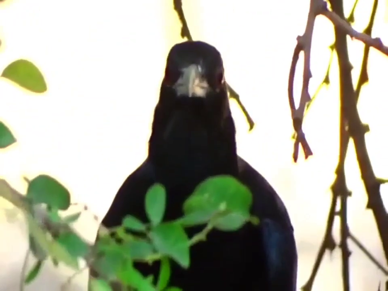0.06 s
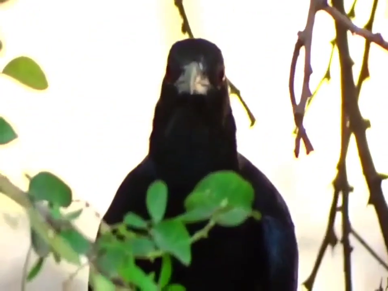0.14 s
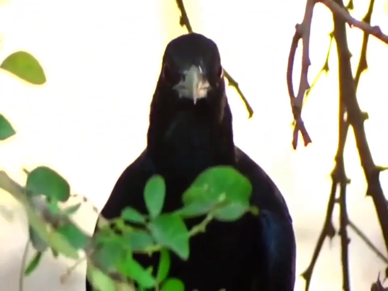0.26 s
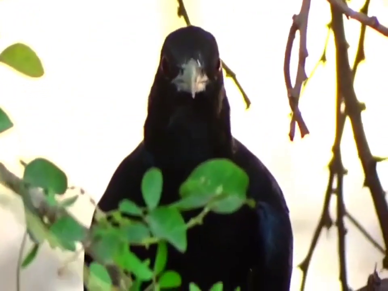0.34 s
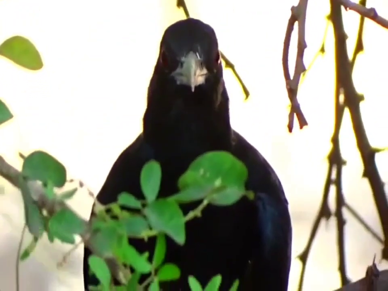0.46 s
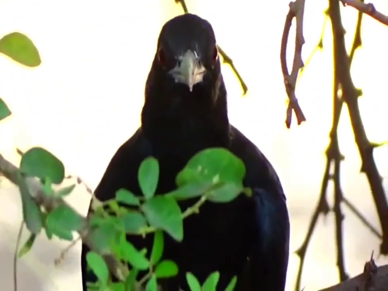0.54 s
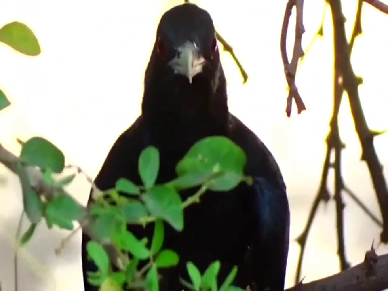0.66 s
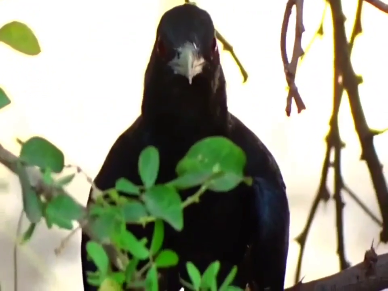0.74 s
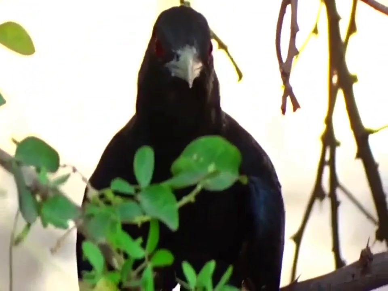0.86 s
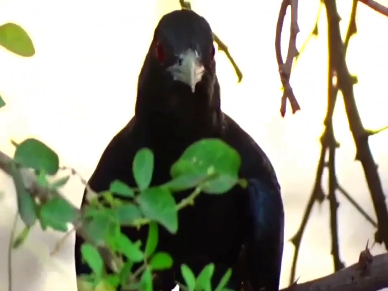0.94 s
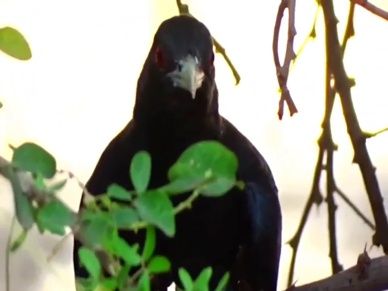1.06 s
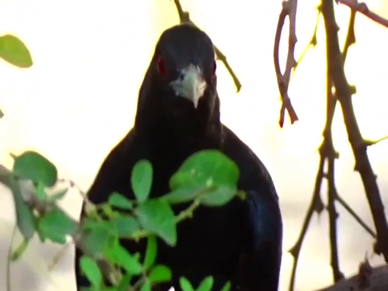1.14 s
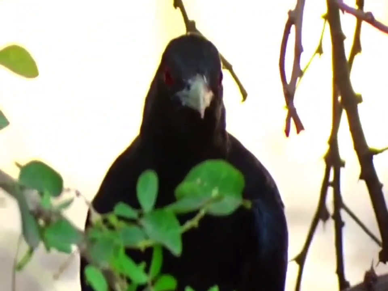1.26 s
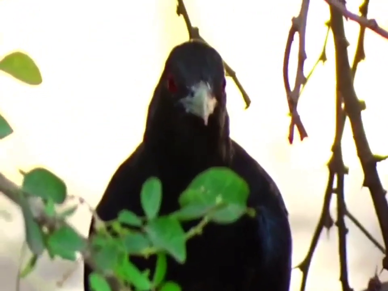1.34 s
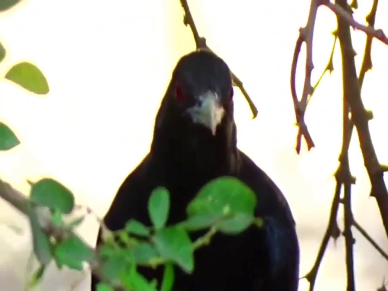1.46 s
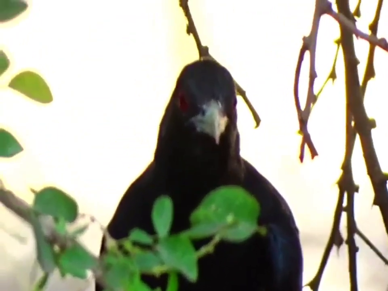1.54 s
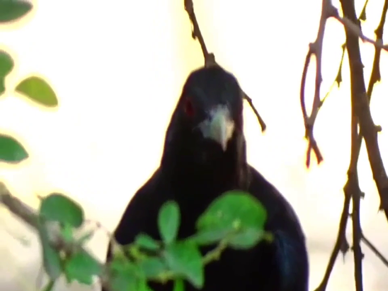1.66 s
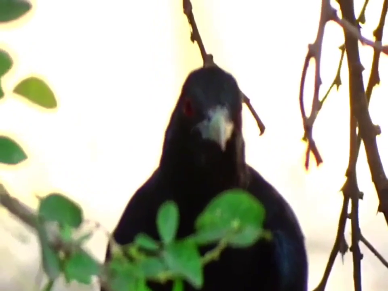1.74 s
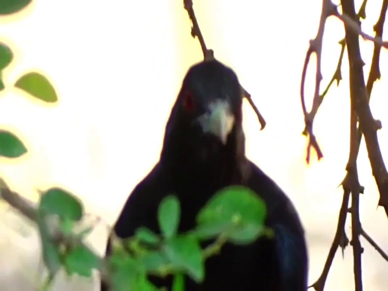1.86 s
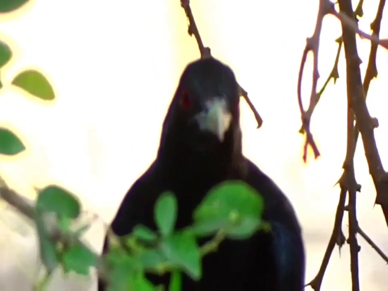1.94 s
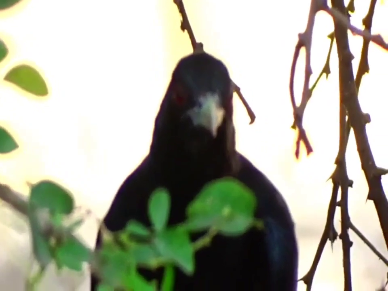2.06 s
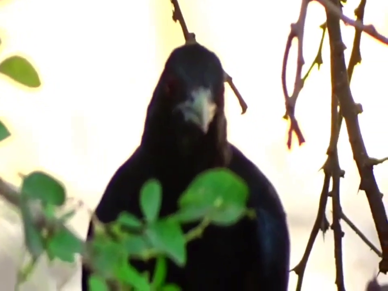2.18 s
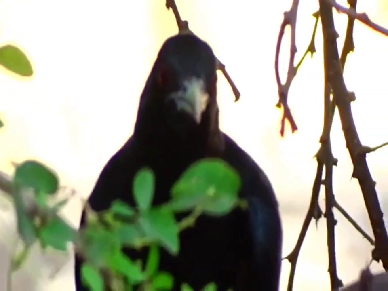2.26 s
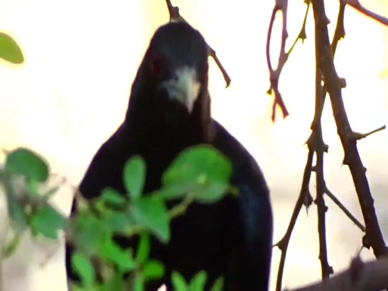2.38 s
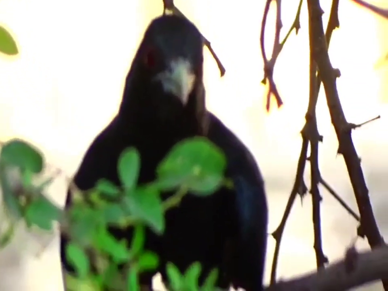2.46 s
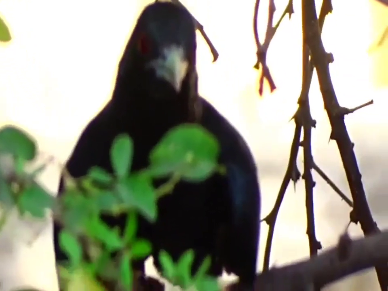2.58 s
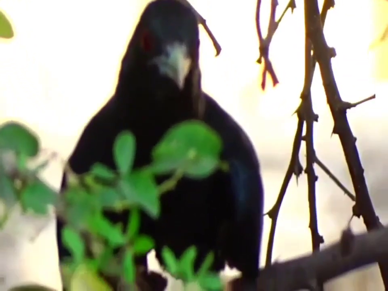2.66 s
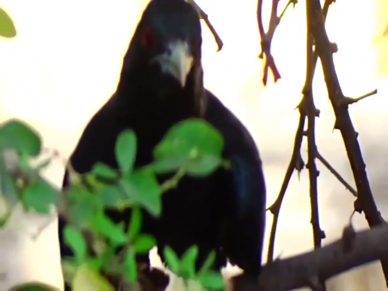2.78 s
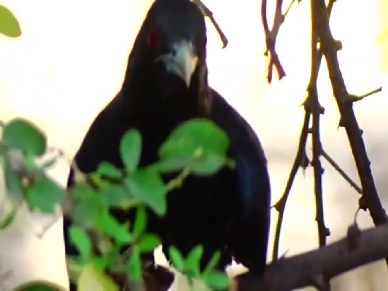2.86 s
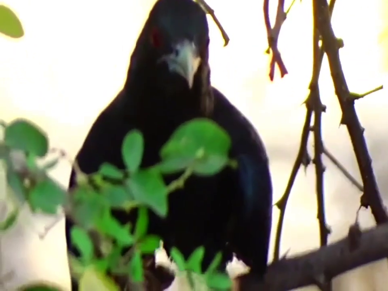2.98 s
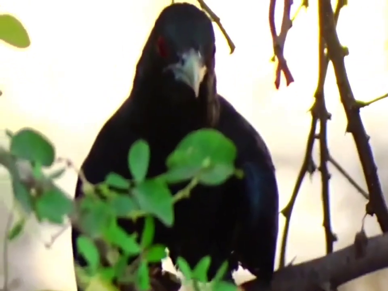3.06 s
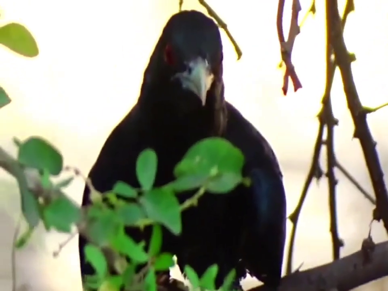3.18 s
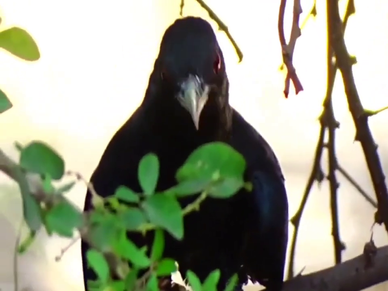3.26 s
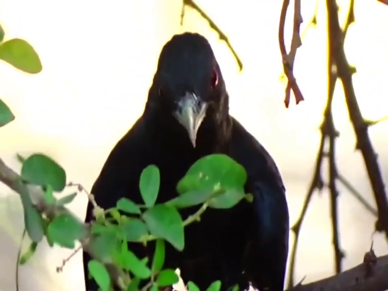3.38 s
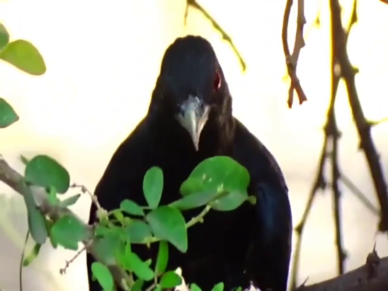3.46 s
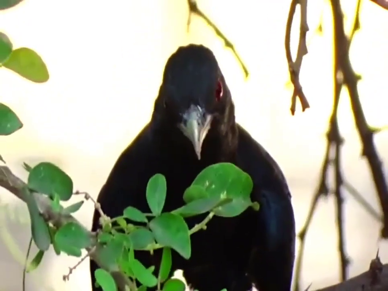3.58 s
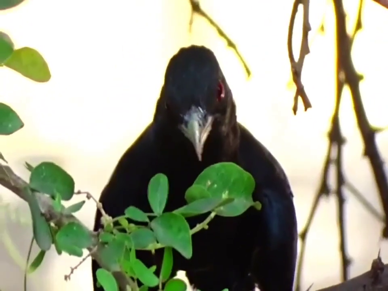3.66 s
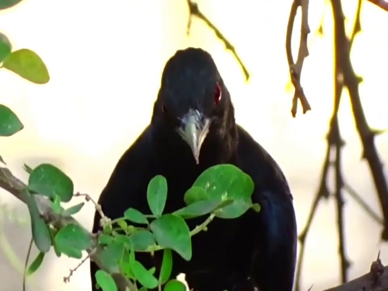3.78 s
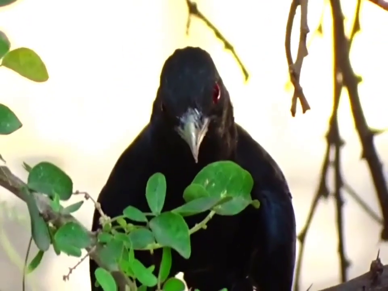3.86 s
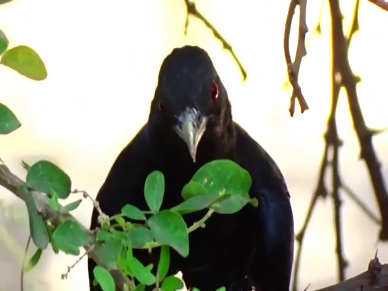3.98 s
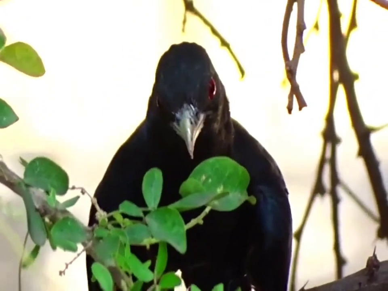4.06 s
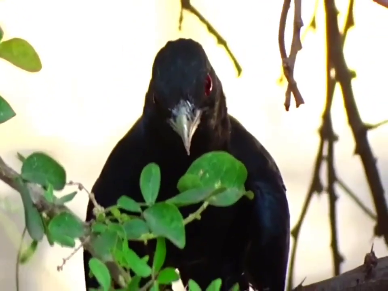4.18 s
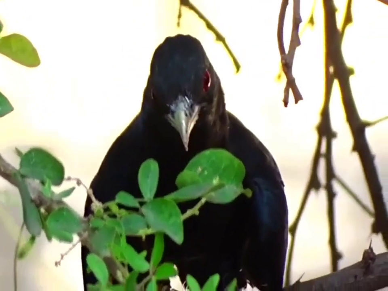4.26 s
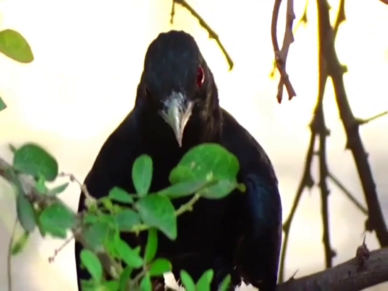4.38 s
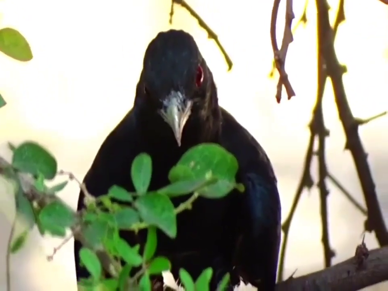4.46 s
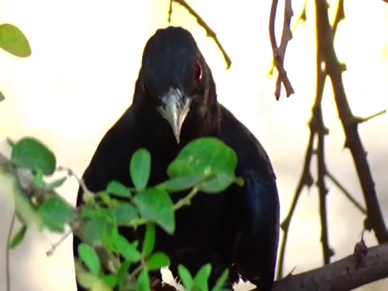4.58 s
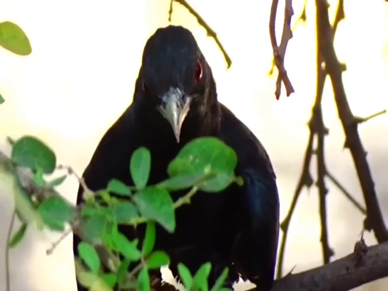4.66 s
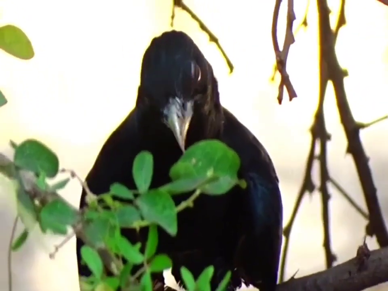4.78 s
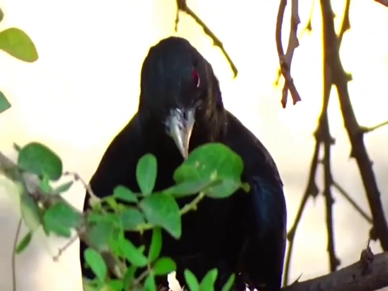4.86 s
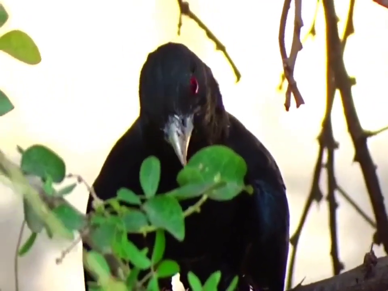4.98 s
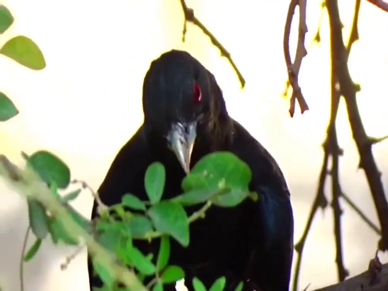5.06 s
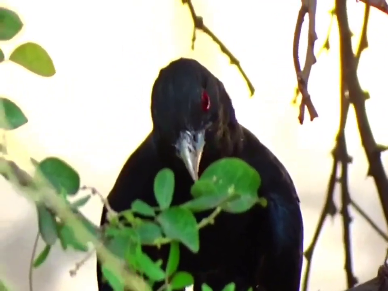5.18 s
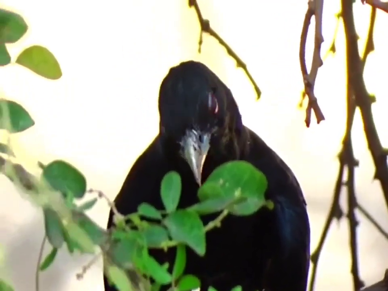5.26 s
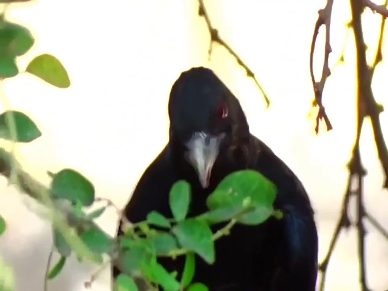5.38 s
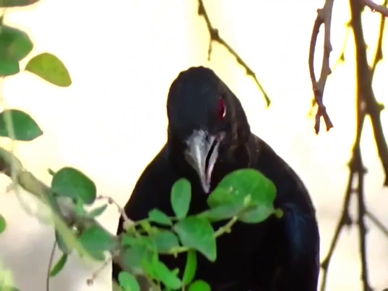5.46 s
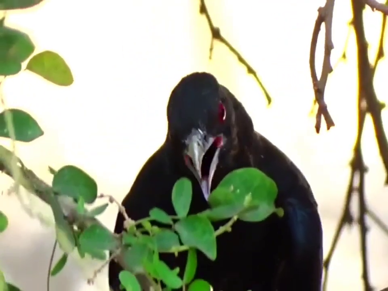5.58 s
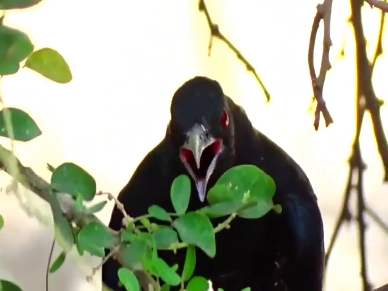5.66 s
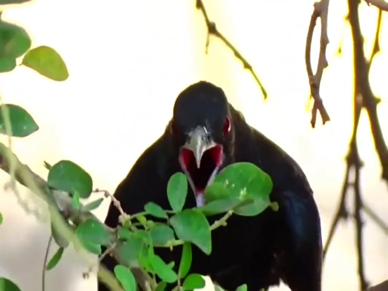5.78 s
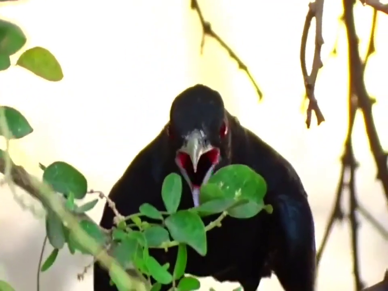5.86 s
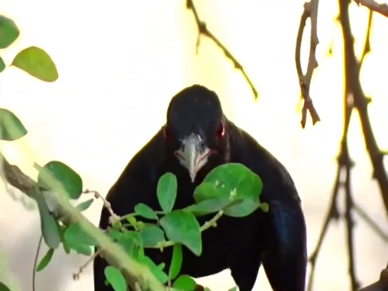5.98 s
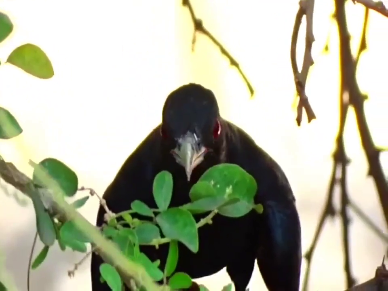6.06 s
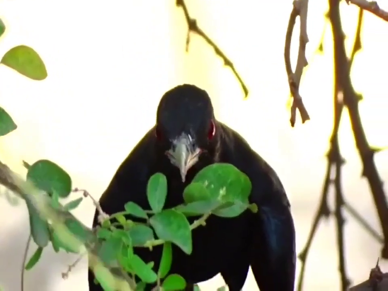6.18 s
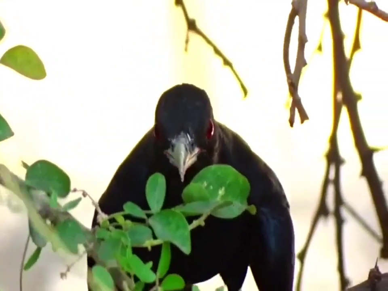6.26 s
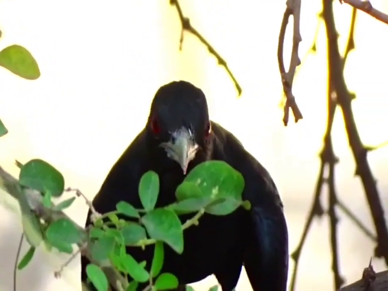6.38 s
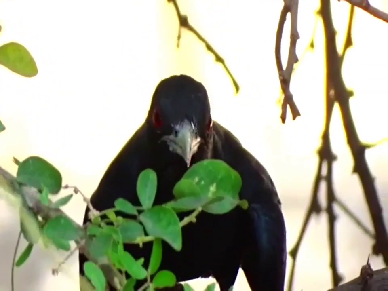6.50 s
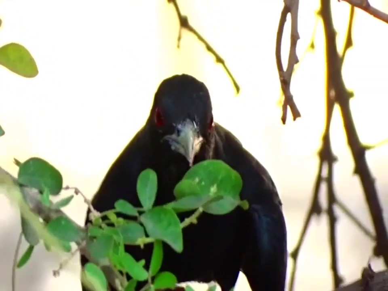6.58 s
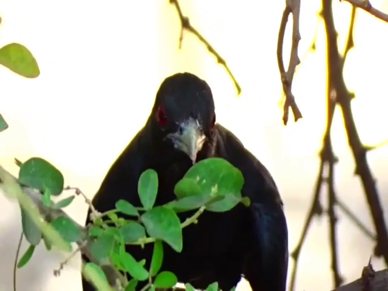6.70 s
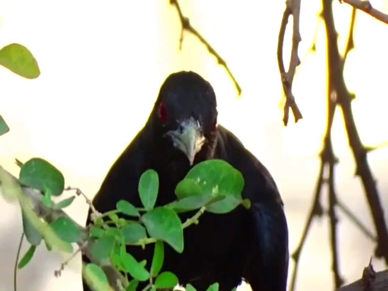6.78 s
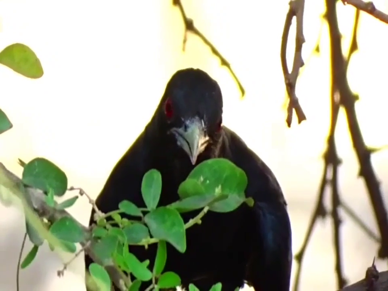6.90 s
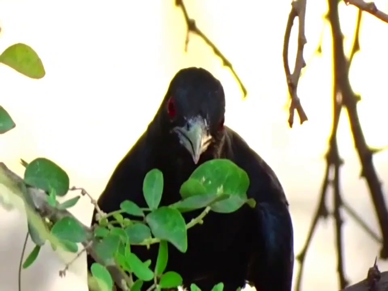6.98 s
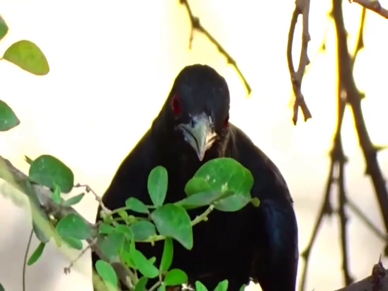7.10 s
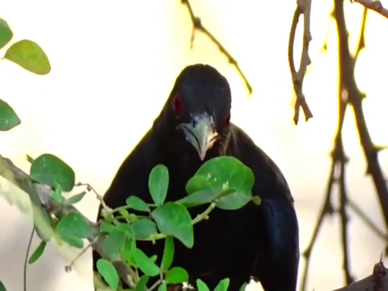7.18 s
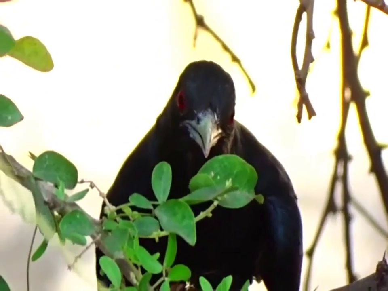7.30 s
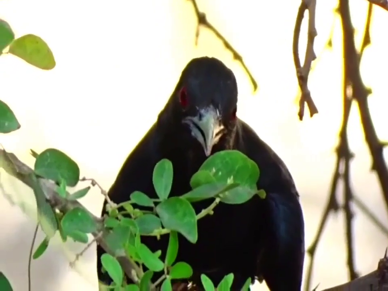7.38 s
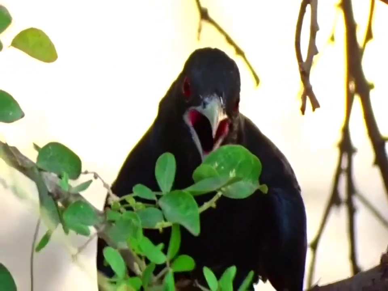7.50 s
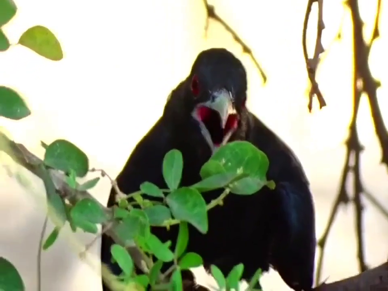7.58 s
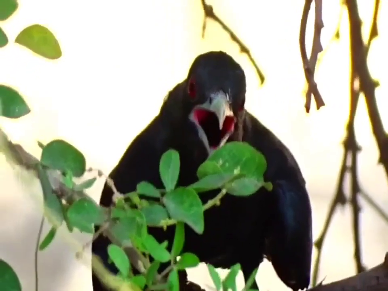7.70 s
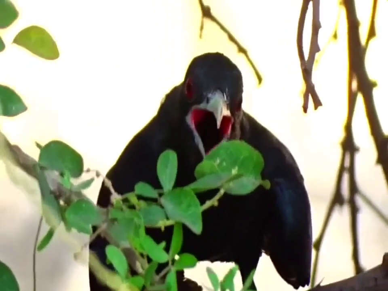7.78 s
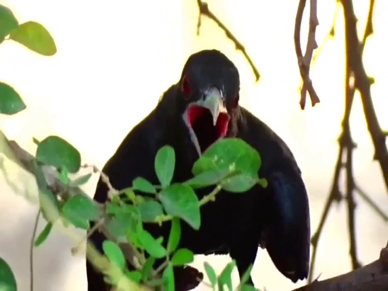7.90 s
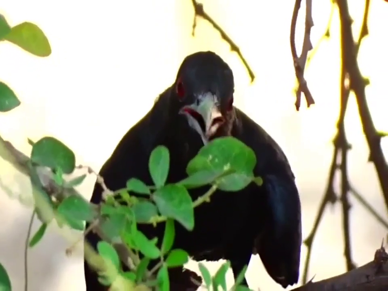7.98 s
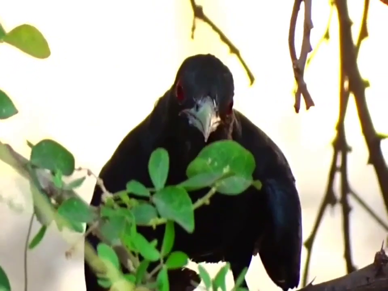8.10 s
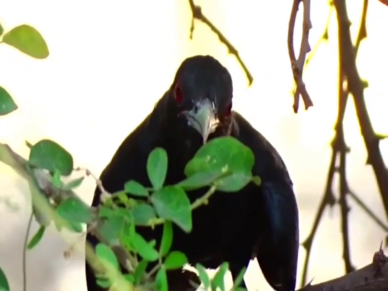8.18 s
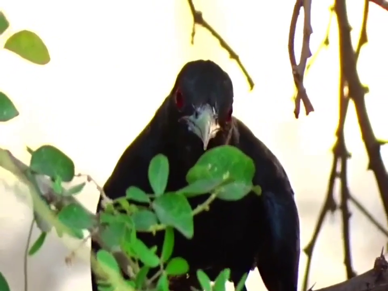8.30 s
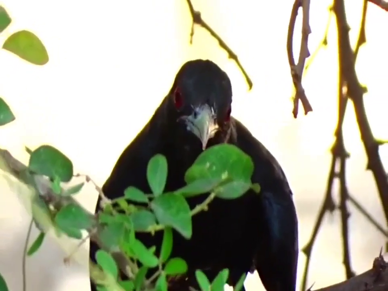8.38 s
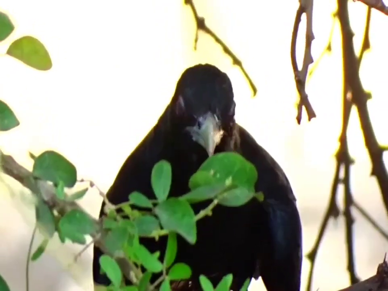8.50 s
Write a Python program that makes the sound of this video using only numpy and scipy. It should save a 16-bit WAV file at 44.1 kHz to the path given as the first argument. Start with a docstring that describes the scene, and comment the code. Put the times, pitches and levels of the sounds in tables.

```python
"""Among trees and walls outside a distant town: a koel on a near branch gives two rising calls that drop at
the end, a gliding whistle with weak overtones. Walls and trees throw them back as a long decaying noise tail.
Further off, small birds whistle and chirp (gliding sines) and rasp (noise in a resonance), over a far chorus.
A twig ticks close by. The town hums as banded noise with a far engine's rumble; puffs of wind, low resonant
noise, reach the microphone."""
import sys
import numpy as np
from scipy import signal
from scipy.io import wavfile

SR = 44100
rng = np.random.default_rng(int(sys.argv[2]) if len(sys.argv) > 2 else 0)


def wrap_up_sound(samples):
    """Save the sound to the file named by the first command line argument, as 16-bit audio."""
    columns = np.atleast_2d(samples).T
    # keep every value between -1 and 1, then stretch to whole-number steps
    tamed = np.clip(columns, -1, 1)
    steps = np.round(tamed * 32767).astype(np.int16)
    wavfile.write(sys.argv[1], SR, steps)


N = 376613


def amp(db):
    """Decibels to gain."""
    return 10 ** (np.asarray(db) / 20)


def rms_one(x):
    """Scales to unit rms."""
    return x / np.sqrt(np.mean(x ** 2) + 1e-20)


def at_hz(points, hz, axis=1):
    """Reads a table column on a log-frequency axis."""
    points = np.array(points)
    return np.interp(np.log(hz), np.log(points[:, 0]), points[:, axis])


def in_time(rows):
    """Reads a level curve at every sample."""
    return np.interp(np.arange(N) / SR, *np.transpose(rows))


def resonance(x, hz, width_hz):
    """Two-pole resonance around hz; a narrower width rings longer."""
    radius = np.exp(-np.pi * width_hz / SR)
    poles = [1, -2 * radius * np.cos(2 * np.pi * hz / SR), radius * radius]
    return signal.lfilter([1, 0, -1], poles, x)


def drift(rate_hz, size=N):
    """Random wandering of unit rms: noise kept below rate_hz, after a second to settle."""
    lowpass = signal.butter(2, rate_hz, fs=SR, output="sos")
    return rms_one(signal.sosfilt(lowpass, rng.standard_normal(size + SR))[SR:])


def add(out, start_s, sound, pan_db=0):
    """Mixes a sound in at a time, with the left louder than the right by pan_db."""
    i = max(round(start_s * SR), 0)
    sound = sound[:N - i]
    out[:, i:i + len(sound)] += sound * amp([[pan_db / 2], [-pan_db / 2]])


def bands():
    """Half-octave band filters with their centres."""
    edges = 25 * 2 ** np.arange(0, 9.1, .5)
    return [(signal.butter(2, [low, high], "band", fs=SR, output="sos"), np.sqrt(low * high))
            for low, high in zip(edges, edges[1:])]


def stereo(pair, side_db):
    """Mid and side noise to left and right."""
    mid, side = pair[0], amp(side_db) * pair[1]
    return np.array([mid + side, mid - side])


def sung(rows):
    """Phase of a pitch curve, and its level columns as sine amplitudes with soft ends."""
    s, hz, *levels = np.transpose(rows)
    t = np.arange(s[0], s[-1], 1 / SR)
    ends = np.clip(np.minimum(t - s[0], s[-1] - t) / 0.0068, 0, 1)
    phase = np.cumsum(2 * np.pi * np.interp(t, s, hz) / SR)
    return phase, [np.sqrt(2) * ends * amp(np.interp(t, s, level)) for level in levels]


# colour of the far hum: (frequency [Hz], relative density [dB per Hz])
TOWN_COLOUR = [(15, -47), (25, -25), (64, -6), (131, -1), (274, 1), (651, -5), (819, -8), (1470, -10.5),
               (1950, -21), (2390, -6.5), (3500, -22.5), (6960, -18), (11000, -28), (14300, -61),
               (22000, -120)]
# loudness of the hum before a 2 dB lift: (time [s], level [dB])
TOWN_LEVEL = [(0.0, -53.5), (5.35, -55), (5.9, -51.5), (7.42, -54), (8.54, -52)]
# stereo width of the hum: (frequency [Hz], side against mid [dB])
TOWN_SIDE = [(40, -15), (190, -14), (600, -5.5), (1100, -4), (3400, -7), (6100, -10.5), (10900, -2.5)]
# far engine, before a 1.5 dB lift: (time [s], level of its low band [dB])
RUMBLE = [(0.0, -54), (0.3, -74.5), (4.2, -63.5), (4.9, -71.5), (6.8, -74), (7.92, -57.5), (8.54, -60)]
RUMBLE_HZ, RUMBLE_WIDTH_HZ = 44, 5.5
RUMBLE_HIGH_HZ, RUMBLE_HIGH_WIDTH_HZ, RUMBLE_HIGH_DB = 130, 64, 4   # level against the low band


def town():
    """Distant traffic and leaves: smooth noise, slightly patchy, with a far engine's low rumble."""
    hum, white = 0, rng.standard_normal((2, 2, N))
    together = drift(1.0)
    for k, (sos, hz) in enumerate(bands()):
        gain = amp(at_hz(TOWN_COLOUR, hz) + .5 * together + 1.47 * drift(9.9))
        # alternate noises keep neighbouring bands independent
        hum = hum + gain * stereo(signal.sosfilt(sos, white[k % 2]), at_hz(TOWN_SIDE, hz))
    low = resonance(rng.standard_normal((2, N)), RUMBLE_HZ, RUMBLE_WIDTH_HZ)
    high = resonance(rng.standard_normal((2, N)), RUMBLE_HIGH_HZ, RUMBLE_HIGH_WIDTH_HZ)
    rumble = rms_one(stereo(low, -19)) + amp(RUMBLE_HIGH_DB) * rms_one(stereo(high, -18.0))
    return amp(in_time(TOWN_LEVEL) + 2.0) * rms_one(hum) + amp(in_time(RUMBLE) + 1.5) * rumble


# wind on the microphone, before a 4 dB lift: (middle of the puff [s], peak level [dB])
PUFFS = [(0.876, -44.5), (2.032, -49), (2.897, -52), (4.146, -51)]


def wind():
    """Short low puffs at the microphone: a few lumpy pressure swings."""
    out, t = np.zeros((2, N)), np.arange(round(.08 * SR)) / SR
    for middle, peak_db in PUFFS:
        swings = resonance(rng.standard_normal(2 * len(t)), 90, 48)[len(t):]
        puff = swings * np.sin(np.pi * t / t[-1]) ** 2
        add(out, middle - .03, amp(peak_db + 4) * puff / abs(puff).max())   # roughly centred
    return out


CHORUS_PER_S, CHORUS_LOW_HZ, CHORUS_HIGH_HZ = 70, 1500, 7500   # calls per second, range of middle pitch
CHORUS_DB = -70   # peak of the faintest call


def chorus():
    """Many faint random glides from far trees."""
    out = np.zeros((2, N))
    for when, pitch, bend, long, loud in rng.random((round(CHORUS_PER_S * N / SR), 5)):
        u = np.linspace(-1, 1, round((0.0231 + 0.21 * long) * SR))
        middle_hz = CHORUS_LOW_HZ * (CHORUS_HIGH_HZ / CHORUS_LOW_HZ) ** pitch
        hz = middle_hz * (1 + .4 * (bend - .6) * u)
        call = (1 - u ** 2) * np.sin(np.cumsum(2 * np.pi * hz / SR))
        add(out, when * N / SR, amp(CHORUS_DB + 4.8 * loud) * call)
    return out


# rising song of a small bird: (top of the rise [s], slow lead-in [s], start pitch [Hz], level [dB])
SONG = [(2.74, .12, 4560, -46), (3.114, 0.14, 4285, -47.5), (4.492, 0.13, 4220, -46),
        (5.7, 0.18, 4255, -46.5), (7.49, 0.16, 4615, -49)]
# shape shared by all songs after the lead-in: (time from the top [s], pitch [Hz], against the level [dB])
SONG_END = [(-.05, 4995, -2.5), (-.022, 5480, 1), (0.0, 6170, -10.5), (0.026, 4164, 2.5)]
SONG_START_DB = -6   # against the level
# pure chirps and whistles in the trees:
# (time [s], length [s], start pitch [Hz], end pitch [Hz], level [dB], left against right [dB])
NOTES = [ (0.185, 0.011, 6400, 5870, -63, -4), (0.276, 0.015, 4250, 5360, -54.5, 0),
         (0.276, 0.029, 7500, 7700, -62, 0), (0.286, 0.05, 3430, 2510, -57, 0),
         (0.456, 0.024, 4320, 5560, -57, 0), (0.459, 0.068, 3300, 3300, -64, 0),
         (.56, 0.052, 4200, 5070, -62.5, 0), (0.683, 0.48, 4000, 4270, -74.5, -2),
         (0.948, 0.024, 7100, 5440, -47.5, 0), (1.062, 0.062, 7670, 5480, -46.5, -2),
         (1.387, 0.019, 2930, 3000, -65, -3), (1.41, 0.029, 2370, 2640, -65, 0),
         (1.534, 0.015, 2870, 3010, -61, 0), (1.554, 0.03, 2110, 2490, -64, 0),
         (1.486, 0.21, 7100, 7050, -72, -2), (1.6, 0.32, 3910, 3690, -71.5, 0),
         (1.925, 0.017, 6370, 6000, -64, -2), (1.95, 0.2, 2480, 2415, -66, 0),
         (1.975, 0.03, 4650, 4150, -56.5, 0), (1.984, 0.059, 4064, 4090, -53, -3),
         (2.409, 0.025, 4980, 4450, -57, 0), (2.445, 0.02, 6000, 6090, -48.5, 0),
         (2.79, 0.23, 3530, 2950, -64.5, -2), (3.03, 0.16, 2950, 3170, -66, -2),
         (3.245, 0.17, 3610, 2840, -62.5, 0), (3.248, 0.032, 6340, 6500, -57.5, 0),
         (3.295, 0.032, 5080, 4070, -53, -2), (3.583, 0.22, 3520, 2440, -64, -4),
         (3.74, 0.1, 5800, 5600, -74, 0), (3.86, 0.022, 5640, 4950, -66, -2),
         (3.9, 0.023, 2840, 2630, -61.5, -3), (4.229, 0.037, 5640, 3670, -45.5, 0),
         (4.528, 0.015, 4040, 4470, -47.5, -3), (4.567, 0.18, 3470, 2930, -64.5, -2),
         (4.722, 0.025, 5130, 3980, -51.5, -4), (4.887, 0.093, 7100, 6950, -66, -3),
         (5.361, 0.07, 5440, 5060, -55, 0), (5.375, 0.025, 4650, 3080, -62, 0),
         (5.71, 0.051, 4360, 4350, -52.5, 0), (6.415, 0.039, 3270, 3100, -62.5, 6),
         (6.625, 0.026, 4520, 4440, -54.5, 0), (6.636, 0.1, 2132, 2485, -57, 8),
         (6.76, 0.02, 7700, 5300, -57.5, -3), (7.056, 0.02, 4660, 4030, -66, -6),
         (7.165, 0.025, 4440, 4040, -58.5, 2), (7.187, 0.06, 4070, 3980, -55.5, -3),
         (7.205, 0.029, 6270, 4000, -53, 0), (7.494, 0.03, 4380, 4470, -53, 3),
         (7.503, 0.021, 2800, 3120, -57, 4), (7.856, 0.034, 3000, 3780, -46, 8),
         (8.002, 0.05, 2660, 2110, -40.5, -5), (8.048, 0.046, 2120, 2876, -42, 0), ]
# quick falling chips: (time [s], start pitch [Hz], level [dB])
CHIPS = [(0.323, 4830, -54.5), (1.12, 5280, -53), (2.462, 5230, -43.5), (2.782, 5480, -49),
         (3.157, 5650, -43), (4.552, 5350, -45.5), (5.238, 5160, -56), (5.416, 5400, -44.5),
         (7.531, 5470, -47.5)]
CHIP_S, CHIP_FALL = 0.011, .3   # length, share of the pitch lost
# reedy calls of a lower voice, same columns as the pure notes:
# (time [s], length [s], start pitch [Hz], end pitch [Hz], level [dB], left against right [dB])
REEDY = [(1.782, 0.12, 2516, 2450, -56, 2), (1.991, 0.061, 2040, 2450, -58, -2),
         (4.715, .095, 2106, 2945, -51.5, 4), (6.4, 0.135, 2500, 2560, -54, 3),
         (7.539, 0.047, 2417, 2580, -55, 2)]
REEDY_OCTAVE_DB, PURE_OCTAVE_DB = -9.5, -41   # second partial against the first
WARBLE = 0.017   # share by which a small bird's pitch trembles
# harsh rasping chirps, level before the swell and fade:
# (time [s], length [s], centre [Hz], width of each resonance [Hz], level [dB], share spent rising [0-1])
RASPS = [ (0.28, 0.068, 4620, 2000, -56, 0.28), (0.969, 0.074, 6170, 1690, -50.5, 0.13),
         (1.149, 0.036, 6940, 6000, -42, 1), (1.298, 0.015, 6850, 4930, -50.5, .3),
         (2.229, 0.076, 6000, 2500, -55, 0.48), (2.4, 0.064, 6570, 1940, -52, 0.56),
         (2.864, 0.2, 7400, 5070, -58.5, 0.093), (3.102, 0.18, 7400, 5000, -57, 0.34),
         (4.024, 0.077, 6200, 1500, -46.5, 0.54), (4.068, 0.065, 6940, 2680, -34, 0.035),
         (4.064, 0.075, 9900, 2000, -48, .05), (4.072, 0.034, 3220, 2000, -42, 0.15),
         (4.132, 0.16, 7040, 2500, -52, 0.23), (4.49, 0.061, 7400, 2500, -58.5, 0.36),
         (4.658, 0.029, 6300, 1980, -51, .1), (5.163, 0.086, 6100, 2270, -44, 0.94),
         (6.295, 0.015, 7450, 4990, -50.5, 0.54), (6.969, 0.13, 5890, 1986, -58.5, 0.24),
         (7.586, 0.013, 8450, 5000, -54, 0.36), ]
RASP_PAN_DB = -1.5
# far calls blurred to a narrow hiss, level before the swell and fade:
# (time [s], length [s], centre [Hz], level [dB], left against right [dB])
BLURRED = [(0.0, 0.16, 3170, -55, 0), (0.0, 0.14, 3480, -60.5, 0), (0.96, 0.065, 3340, -56.5, 0),
           (1.165, 0.13, 2950, -63.5, 0), (3.043, 0.42, 1400, -64.5, 5), (3.15, 0.64, 1020, -70.5, 7),
           (4.6, 0.7, 1400, -65.5, -2), (5.185, 0.12, 3090, -60.5, -2), (5.564, 0.11, 1370, -55.5, -2),
           (7.552, 0.37, 1440, -58, 0), (8.097, 0.18, 2500, -58, -3)]
BLURRED_WIDTH_HZ, BLURRED_RISE = 280, 0.086   # rise as a share of the length


def small_birds():
    """Songs and notes are gliding sines; rasps are noise in a wide throat resonance, chopped by the syrinx."""
    out = np.zeros((2, N))
    for top, lead, start_hz, level_db in SONG:
        start = top + SONG_END[0][0] - lead
        rows = [(start, start_hz, level_db + SONG_START_DB)]
        rows += [(top + s, hz, level_db + db) for s, hz, db in SONG_END]
        phase, (level,) = sung(rows)
        add(out, start, level * np.sin(phase), -.3)

    tremble = WARBLE * drift(220)
    chips = [(s, CHIP_S, hz, hz * (1 - CHIP_FALL), db, 0) for s, hz, db in CHIPS]
    pure = list(NOTES) + chips
    for notes, octave_db in ((pure, PURE_OCTAVE_DB), (REEDY, REEDY_OCTAVE_DB)):
        for start, length, start_hz, end_hz, level_db, pan_db in notes:
            u = np.linspace(-1, 1, round(length * SR))
            glide = np.linspace(start_hz, end_hz, len(u))
            hz = glide * (1 + tremble[round(start * SR):][:len(u)])
            phase = np.cumsum(2 * np.pi * hz / SR)
            tone = np.sin(phase) + amp(octave_db) * np.sin(2 * phase)
            envelope = np.sqrt(2) * (1 - u ** 2) ** 0.09
            add(out, start, amp(level_db) * envelope * tone, pan_db)

    air = rng.standard_normal(N) * amp(3.4 * drift(250))   # rough breath
    rasps = [(*row, RASP_PAN_DB) for row in RASPS]
    blurred = [(s, length, hz, BLURRED_WIDTH_HZ, db, BLURRED_RISE, pan_db)
               for s, length, hz, db, pan_db in BLURRED]
    for start, length, centre_hz, width_hz, level_db, rise, pan_db in rasps + blurred:
        i, u = round(start * SR), np.linspace(0, 1, round(length * SR))
        breath = resonance(air[i:i + len(u)], centre_hz, width_hz)
        breath = resonance(breath, centre_hz, width_hz)
        envelope = np.minimum(u / rise, 1) * (1 - u ** 2)
        add(out, start, amp(level_db) * rms_one(breath) * envelope, pan_db)
    return out


FOLIAGE_DB, FOLIAGE_T60_S = 1.5, .22   # level against the direct sound, time to fall 60 dB


def foliage(x):
    """The crowns around the small birds smear each note: short dense scatter as decaying noise."""
    t = np.arange(round(.4 * SR)) / SR
    tail = stereo(rng.standard_normal((2, len(t))), -13.0) * np.exp(-np.log(1000) * t / FOLIAGE_T60_S)
    tail = tail / np.sqrt(np.sum(tail ** 2) / 2)
    return amp(FOLIAGE_DB) * signal.fftconvolve(x.mean(axis=0)[None], tail, axes=1)[:, :N]


# time to fall 60 dB: (frequency [Hz], near scatter [s], far tail [s])
DECAY = [(800, 0.4, 2.04), (1400, 0.56, 1.88), (3000, 0.68, 1.4), (6000, 0.66, 1.17), (10000, 0.098, 0.67)]
# stereo width of the scatter: (frequency [Hz], side against mid [dB])
SCATTER_SIDE = [(600, -10), (1300, -7.5), (3400, -9), (6100, -15.5), (10900, -2)]
NEAR_DB, FAR_DB = -0.5, -4.5   # against the sound sent in
WALL_S, WALL_DB, WALL_T60_S, WALL_DULL_HZ = 0.36, -25, 0.075, 2500   # a distant wall, duller above 2500 Hz


def space(x):
    """Leaves and trunks scatter densely, far walls ring on; the treble dies first."""
    t = np.arange(round(2.2 * SR)) / SR
    tail, white = 0, rng.standard_normal((2, 2, len(t)))
    after_wall = np.maximum(t - WALL_S, 0)
    for k, (sos, hz) in enumerate(bands()[8:]):   # from 400 Hz up
        wall_db = WALL_DB - 10 * np.log10(1 + (hz / WALL_DULL_HZ) ** 2)
        near = (NEAR_DB, at_hz(DECAY, hz), t)
        far = (FAR_DB, at_hz(DECAY, hz, axis=2), t)
        wall = (wall_db, WALL_T60_S, after_wall)
        energy = 0
        for level_db, t60, since in (near, far, wall):
            rate = 2 * np.log(1000) / t60
            # scaled so that each decay sums to the energy of its level
            energy = energy + amp(2 * level_db) * rate / SR * np.exp(-rate * since) * (since > 0)
        noise = stereo(signal.sosfilt(sos, white[k % 2]), at_hz(SCATTER_SIDE, hz))
        tail = tail + np.sqrt(energy) * noise
    return signal.fftconvolve(x.mean(axis=0)[None], tail, axes=1)[:, :N]


# a twig ticks, before a 4.5 dB cut: (time [s], peak level [dB])
TICK = [(4.258, -20.5)]


def twig():
    """A dry tick close by, full down to the low mids: a click and brief noise in a wide resonance."""
    out, t = np.zeros((2, N)), np.arange(round(.02 * SR)) / SR
    for start, peak_db in TICK:
        crackle = .4 * rng.standard_normal(len(t)) * np.exp(-t / .002)
        snap = resonance((t == 0) + crackle, 1500, 2600)
        add(out, start, amp(peak_db - 4.5) * snap / abs(snap).max())
    return out


# the near koel, one list per call:
# (time [s], pitch [Hz], level of the whistle, dipping where it beats against its own echoes [dB])
KOEL = [
    [(5.572, 1107, -45.5), (5.6, 1186, -45.5), (5.66, 1217, -33.5), (5.74, 1251, -24.5), (5.808, 1316, -24),
     (5.85, 1361, -30), (5.885, 1368, -22.5), (5.914, 1332, -26.5), (5.964, 1152, -26), (6.02, 980, -39),
     (6.09, 808, -51)],
    [(7.578, 1112, -52), (7.605, 1257, -33), (7.66, 1236, -30), (7.734, 1240, -28.5), (7.775, 1256, -20.5),
     (7.84, 1343, -24.5), (7.892, 1417, -22), (7.93, 1431, -18.5), (7.966, 1397, -23), (8.04, 1111, -26.5),
     (8.1, 914, -40.5), (8.165, 797, -43.5), (8.2, 775, -43)],
]
# the higher the koel pushes its pitch, the brighter the voice:
# (pitch [Hz], second partial [dB], base level of the overtones [dB])
BRIGHTNESS = [(780, -70, -97), (910, -63.5, -66.5), (1230, -52.5, -56.5), (1255, -54.5, -50.5),
              (1462, -43.5, -45.5)]
# partials 4 to 9 around the overtone level: (level [dB])
HIGH_PARTIALS_DB = (-10, -10.5, -0.4, -7.5, -1.5, -1)
# throat colour of partials 4 to 9: (frequency [Hz], gain [dB])
THROAT = [(4000, -25.5), (5000, 13), (5800, -0.5), (7000, 10.5), (8500, 1.5), (10000, 1), (11000, -5)]
# effort in partials 4 to 9, one value per call, the second pushed harder: (gain [dB])
OVERTONE_EFFORT_DB = (-1.5, 1.5)
OVERTONE_ATTACK_S, THIRD_PARTIAL_DB = 0.022, -9   # third partial against the second
KOEL_HOARSE_DB, KOEL_HOARSE_HZ = 0.5, 300   # partials 4 to 9 are slightly hoarse
WAVER_DB, WAVER_HZ = 4.5, 25   # each overtone from the third up swells and fades on its own


def koel():
    """A nearly pure whistle, and apart from it a weak stack of overtones coloured by the throat."""
    whistle, overtones = np.zeros((2, 2, N))
    for rows, effort_db in zip(KOEL, OVERTONE_EFFORT_DB):
        start = rows[0][0]
        phase, (main,) = sung(rows)
        waver = WAVER_DB * drift(WAVER_HZ)
        hz = np.gradient(phase) * SR / (2 * np.pi)
        t = np.arange(len(hz)) / SR
        opening = np.sqrt(2) * np.minimum(t / OVERTONE_ATTACK_S, 1) ** 2
        second = opening * amp(at_hz(BRIGHTNESS, hz, axis=1))
        bright = opening * amp(at_hz(BRIGHTNESS, hz, axis=2))
        add(whistle, start, main * np.sin(phase) + second * np.sin(2 * phase), -.4)

        bright = bright * amp(effort_db + KOEL_HOARSE_DB * drift(KOEL_HOARSE_HZ)[:len(phase)])
        stack = 0
        for k, partial_db in enumerate(HIGH_PARTIALS_DB):
            own_waver = waver[k * SR:][:len(hz)]   # a separate second of the drift
            level_db = partial_db + at_hz(THROAT, (k + 4) * hz) + own_waver
            stack = stack + amp(level_db) * np.sin((k + 4) * phase)
        third = second * amp(THIRD_PARTIAL_DB + waver[-len(hz):]) * np.sin(3 * phase)
        add(overtones, start, bright * stack + third, -.8)
    return whistle, overtones


KOEL_WET_DB, SMALL_WET_DB = 0, 2.5   # whistle and small birds as sent into the space
OVERTONE_WET_DB = -5.5   # the open beak beams the treble forward, so less is scattered; also used for the twig
SMALL_DIRECT_DB = 0   # the small birds heard straight through the leaves
FLUTTER_DB, FLUTTER_HZ = 2.5, 60   # moving air and leaves make far notes ragged


def scene():
    """Background, farther small birds, the space around them and the near koel."""
    (whistle, overtones), tick = koel(), twig()
    far = small_birds() * amp(FLUTTER_DB * drift(FLUTTER_HZ))
    sent = amp(KOEL_WET_DB) * whistle + amp(OVERTONE_WET_DB) * (overtones + tick)
    sent = sent + amp(SMALL_WET_DB) * far + chorus()   # the far chorus is heard only as scatter
    background = town() + wind()
    direct = whistle + overtones + tick + amp(SMALL_DIRECT_DB) * far
    return background + foliage(far) + space(sent) + direct


def record(dry):
    """A steep elliptic low-pass cuts the top above 11020 Hz."""
    return signal.sosfilt(signal.ellip(12, .3, 75, 11020, fs=SR, output="sos"), dry)


dry = scene()
out = record(dry)
wrap_up_sound(out)
```